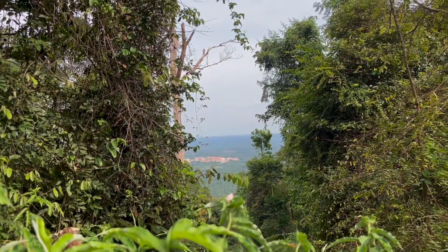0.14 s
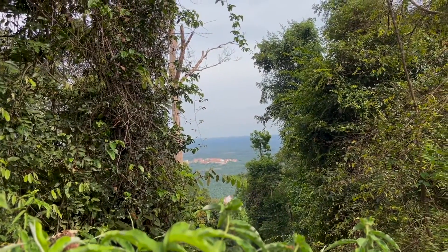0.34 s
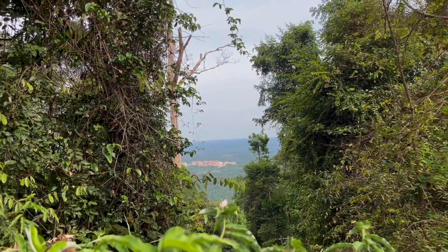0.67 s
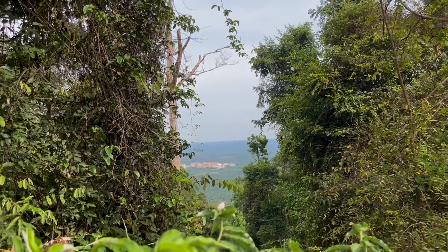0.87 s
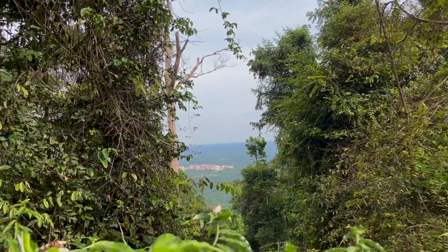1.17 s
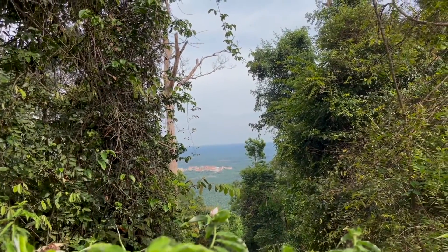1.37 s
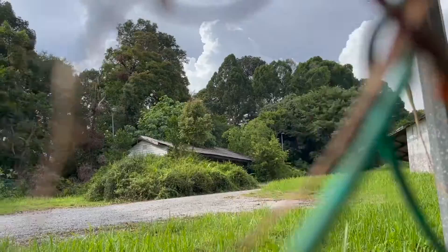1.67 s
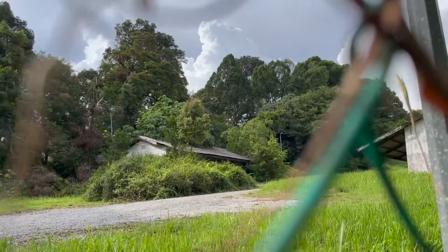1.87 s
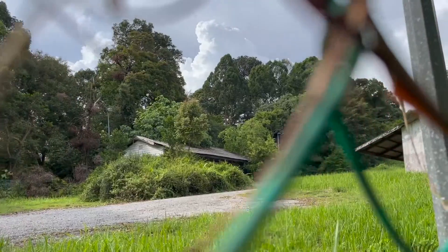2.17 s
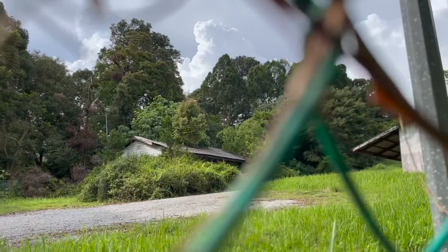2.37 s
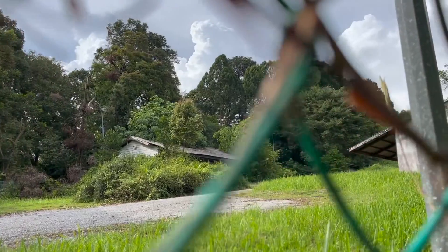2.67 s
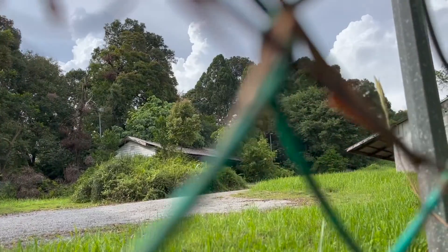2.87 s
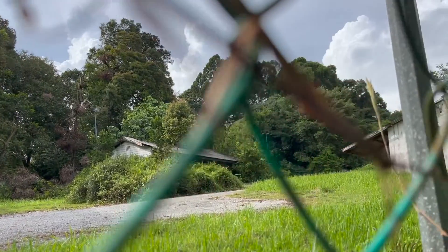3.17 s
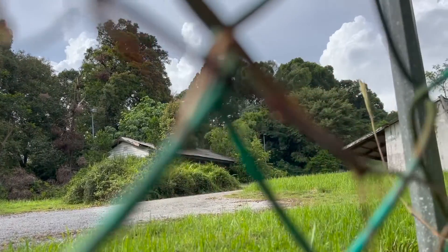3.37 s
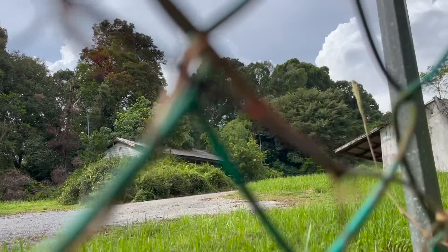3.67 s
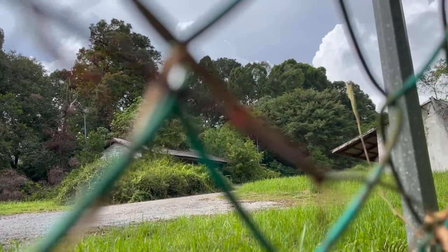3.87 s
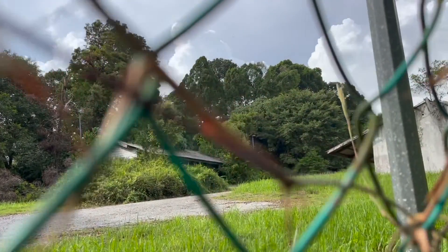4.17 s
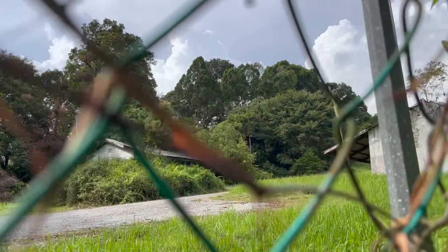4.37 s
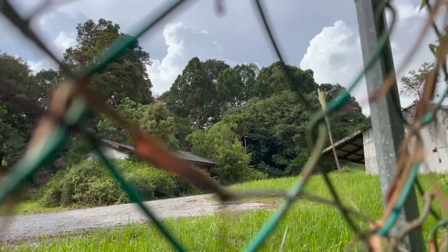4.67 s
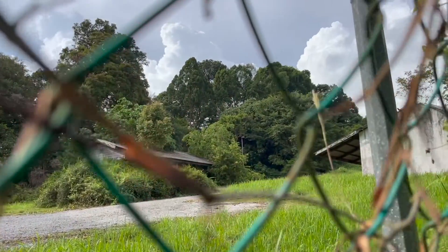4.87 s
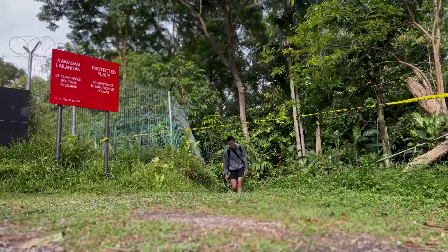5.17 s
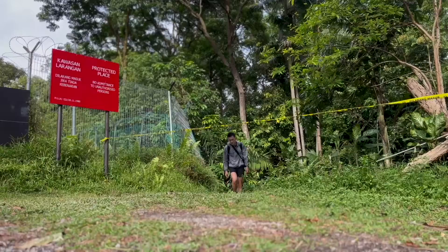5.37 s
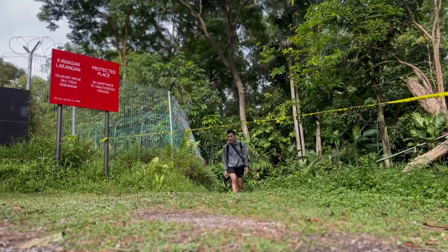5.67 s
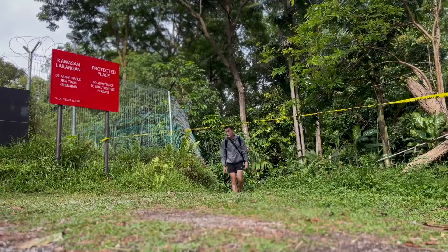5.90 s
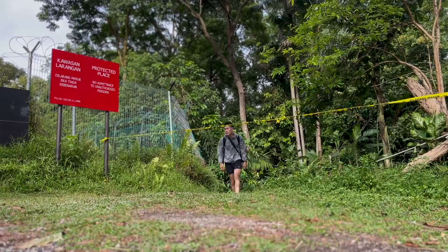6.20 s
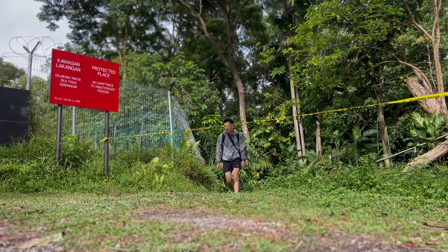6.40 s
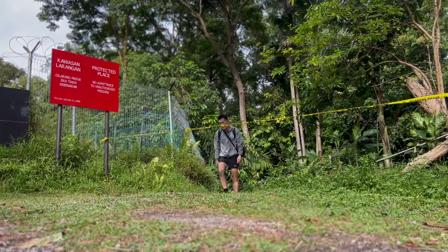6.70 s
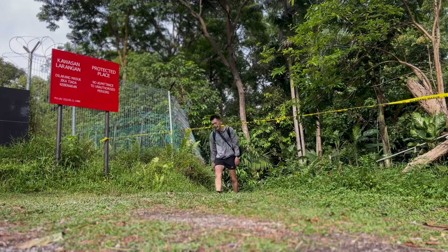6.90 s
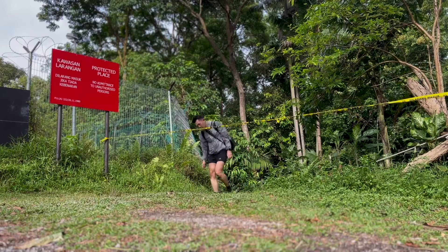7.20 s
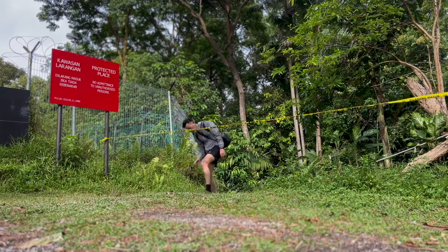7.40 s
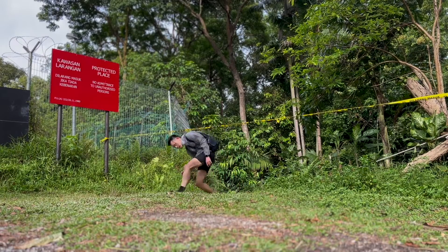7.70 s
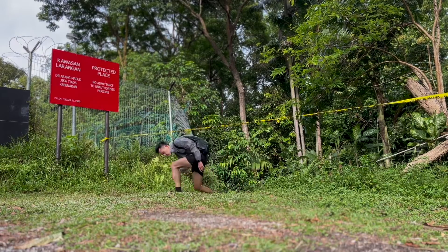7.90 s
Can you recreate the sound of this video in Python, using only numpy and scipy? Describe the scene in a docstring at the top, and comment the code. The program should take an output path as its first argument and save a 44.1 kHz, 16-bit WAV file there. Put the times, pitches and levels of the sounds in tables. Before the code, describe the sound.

Three outdoor spots follow with hard cuts under a constant high hiss of far cicadas. First, one bright, throbbing cicada dominates, with low rumble and hurried bird whistles. Next, a weaker rumble and light breeze carry close granular rustles, small dry snaps and distant slurred bird trills. Finally, quieter grass holds a few soft, dull footfalls, faint bird trills and a thin bush cricket. The stereo is open and diffuse, with faint forest echo.

```python
"""The edge of a tropical forest, at three spots one after another, all under a far chorus of cicadas.
On a lookout one cicada buzzes close by as a comb of lines over the filtered-noise rumble of the lowland;
a bird whistles and chatters. By a wire fence grass rustles in noise bursts and a far bird trills on.
In a clearing soft steps pass through grass while the far bird and a bush cricket trill in narrow noise."""
import sys
import numpy as np
from scipy import signal
from scipy.fft import rfft, irfft, next_fast_len
from scipy.io import wavfile
from scipy.ndimage import uniform_filter1d, map_coordinates

SR = 44100
rng = np.random.default_rng(int(sys.argv[2]) if len(sys.argv) > 2 else 0)


def master_out(mix):
    """Clip the mix to full scale and print it as 16-bit PCM to the path in sys.argv[1]."""
    frames = np.transpose(np.atleast_2d(mix))
    ceiling = np.clip(frames, -1, 1)
    pcm = np.round(ceiling * 32767).astype(np.int16)
    wavfile.write(sys.argv[1], SR, pcm)


N = 355005
TIME = np.arange(N) / SR
# the lookout comes first; the fence and the clearing begin here
FENCE_S, CLEARING_S = 1.633, 5.15


def amp(db):
    """Decibels to gain."""
    return 10 ** (np.asarray(db) / 20)


def unit(x):
    """Scale to rms 1."""
    return x / np.sqrt(np.mean(x ** 2) + 1e-20)


def along(points, hz):
    """(Hz, value) points read on a log frequency axis."""
    f, v = np.transpose(points)
    return np.interp(np.log(hz + 1), np.log(f + 1), v)


def curves(rows):
    """One value per sample for each column after the time."""
    s, *cols = np.transpose(rows)
    return [np.interp(TIME, s, c) for c in cols]


def between(start, end):
    """1 while the listener is at a spot, with 4 ms edges."""
    inside = (TIME >= start) & (TIME < end)
    return uniform_filter1d(inside.astype(float), size=176)


def wobble(rate):
    """A smooth random curve, rate knots a second."""
    knots = rng.standard_normal(int(N * rate / SR) + 4)
    coarse = TIME[::32]
    return np.interp(TIME, coarse, map_coordinates(knots, [coarse * rate]))


def filtered(x, response):
    """x times a response of frequency."""
    m = next_fast_len(N + 8192)
    return irfft(rfft(x, m) * response(np.fft.rfftfreq(m, 1 / SR)), m)[..., :N]


# likeness of a diffuse field at the two microphone ports: hz [Hz], likeness [0 to 1]
PORT_LIKENESS = [(60, .99), (150, 0.92), (300, 0.74), (600, 0.035), (2300, 0.23), (6300, 0.046),
                 (7200, 0.67), (8400, 1), (9000, 1), (10000, 0.15), (12000, 1)]


def spread(pair):
    """Two unrelated signals become left and right, as alike as the ports hear a diffuse field."""
    def mid_and_side(hz):
        turn = np.arccos(np.clip(along(PORT_LIKENESS, hz), -1, 1)) / 2
        return np.array([np.cos(turn), np.sin(turn)])

    mid, side = filtered(pair, mid_and_side)
    return unit(np.array([mid + side, mid - side]))


def rush(shape_db):
    """Diffuse stereo noise of rms 1 with a spectrum given as a function of frequency."""
    return spread(filtered(rng.standard_normal((2, N)), lambda hz: amp(shape_db(hz))))


def noise(points):
    """Diffuse stereo noise of rms 1 with a (Hz, dB) spectrum."""
    return rush(lambda hz: along(points, hz))


def rasp(pitch, width_hz):
    """Stereo noise of rms 1 in one narrow resonance, whose pitch may glide."""
    band = filtered(rng.standard_normal((2, 2, N)), lambda hz: 1 / (1 + (hz / width_hz) ** 2))
    phase = 2 * np.pi * np.cumsum(pitch * np.ones(N)) / SR
    return spread(band[0] * np.cos(phase) + band[1] * np.sin(phase))


def note(start, length, attack, release):
    """A smooth attack, a hold and a smooth release."""
    rise = (TIME - start) / attack
    fall = (start + length - TIME) / release
    ramp = np.clip(np.minimum(rise, fall), 0, 1)
    return np.sin(np.pi / 2 * ramp) ** 2


def trees(x, tail_s):
    """The diffuse echo of the forest edge: decaying noise convolved with the sound."""
    tail = rng.standard_normal((2, SR // 2)) * np.exp(-TIME[:SR // 2] / tail_s)
    return signal.fftconvolve(np.atleast_2d(x), tail / np.linalg.norm(tail[0]), axes=1)[:, :N]


# relative strength of the near cicada's lines: hz [Hz], level_db [dB]
CICADA_LINES = [(6170, -32), (6470, -34), (6760, -21), (7050, -7.5), (7350, 0), (7640, -2.5), (7940, -3.8),
                (8520, -3.5), (8820, -8), (9110, -10.5), (9410, -14), (9700, -13), (9990, -19.5),
                (10290, -20), (10580, -27), (11460, -35.5), (13900, -29), (14700, -37)]
# the abdomen stretches and the weight of the buzz moves up: time_s [s], stretch [-1 to 1]
ABDOMEN_STRETCH = [(.55, -1), (.95, 0), (1.4, 1)]
# what a full stretch does to each line: hz [Hz], change_db [dB]
STRETCH_TILT = [(7050, 2.5), (7350, -2.7), (7640, 0), (8230, 0), (8520, 2.5), (8820, -1), (9110, 3),
                (9410, -1)]
# its effort, and how much arrives scattered by leaves: time_s [s], level_db [dB], scattered_db [dB]
BUZZ_EFFORT = [(0, -39.2, -8), (.25, -38.3, -7), (.8, -40.2, -4), (1.25, -40.1, -5), (1.55, -38.9, -7)]
CLICK_HZ = 293.9
# the abdomen pumps, so that the buzz throbs in level (fraction) and click rate
THROB_HZ, THROB_DEPTH, THROB_SWING_HZ = 22, .12, .25


def near_cicada(apart=0.5):
    """Close by, tymbals click steadily: a comb of lines, each direct plus a blurred copy scattered by leaves."""
    flicker_rate, wander_hz = 50, .15  # flicker in knots a second
    main_line, purer_db = 25, 5
    smear, smear_swing = .6, .4  # scales of the random phase slip
    drift_db, drift_rate = 1.2, 4  # rate in knots a second
    stay = TIME < FENCE_S + .01
    pump = np.sin(2 * np.pi * np.cumsum(THROB_HZ + wobble(4.5)) / SR)
    click_rate = CLICK_HZ + THROB_SWING_HZ * pump + wander_hz * wobble(flicker_rate)
    phase = 2 * np.pi * np.cumsum(click_rate)[stay] / SR
    stretch = curves(ABDOMEN_STRETCH)[0][stay]
    level_db, scattered_db = curves(BUZZ_EFFORT)

    def blur(rate):
        return (wobble(rate)[stay] + 1j * wobble(rate)[stay]) / np.sqrt(2)

    song = np.zeros((2, stay.sum()))
    for k in range(21, 51):
        line_db = along(CICADA_LINES, k * CLICK_HZ) + stretch * along(STRETCH_TILT, k * CLICK_HZ)
        gain = amp(line_db + drift_db * wobble(drift_rate)[stay])
        # the line on the body's resonance stays purest; the top lines blur most
        height = k / main_line
        rate = flicker_rate * height ** np.clip(2 * height - 1, 1, 3)
        leaves = blur(rate) + apart * blur(rate) * np.array([[1], [-1]])
        scattered = height * amp(scattered_db[stay] - purer_db * (k == main_line)) * leaves
        # with every throb the clicks tighten and smear again
        slip = (smear - smear_swing * pump[stay]) * rng.standard_normal() * (k != main_line)
        song += gain * unit(np.real((1 + scattered) * np.exp(1j * (k * phase + slip))))
    buzz = np.pad(unit(song), ((0, 0), (0, N - stay.sum())))
    return buzz * amp(level_db) * (1 + THROB_DEPTH * pump) * between(0, FENCE_S)


# hiss of the far chorus: hz [Hz], level_db [dB]
CHORUS_HISS = [(5400, -28), (6000, -24), (6600, -13), (7200, -2), (7600, 0), (8100, -2.5), (9000, -12.5),
               (10000, -18), (11800, -32), (13200, -30), (14000, -26.5), (14500, -31), (14800, -40)]
# loudness at the lookout, by the fence and in the clearing: level_db [dB]
CHORUS_LEVELS = [-53, -48.6, -49.3]


def chorus(click_hz=300, ripple_db=3, peak_hz=7400, peak_width_hz=1100, shimmer_db=0.5):
    """Many far cicadas blur into a hiss; their common click rate leaves a ripple around its peak."""
    def hiss_db(hz):
        near_peak = np.exp(-((hz - peak_hz) / peak_width_hz) ** 2)
        ripple = ripple_db * np.cos(2 * np.pi * hz / click_hz) * near_peak
        low_fall_db = 90 * np.clip(1 - hz / 5400, 0, 1)
        return along(CHORUS_HISS, hz) - low_fall_db + ripple

    hiss = rush(hiss_db)
    level = np.array(CHORUS_LEVELS)[np.searchsorted([FENCE_S, CLEARING_S], TIME)]
    return hiss * amp(level + shimmer_db * wobble(7))


# spectrum of the lowland's deep rumble: hz [Hz], level_db [dB]
DEEP_RUMBLE = [(22, -42), (32, 11.5), (42, 8.5), (66, 12), (95, -1.5), (160, -46.5)]
# spectrum of the lowland's steady roar: hz [Hz], level_db [dB]
STEADY_ROAR = [(45, -40), (100, -1.5), (170, -2.5), (270, -6.5), (400, -15.5), (560, -16), (800, -27),
               (1100, -30.5), (1800, -47.5), (4000, -48), (6000, -63)]
ROAR_DB, DEEP_DB = -52.5, -53
SWELL_S, SWELL_WIDTH_S, SWELL_DB = 1.3, 0.33, 4


def lowland():
    """Distant traffic and wind reach the lookout: a steady noise roar and a deep rumble that swells once."""
    deep_db = DEEP_DB + SWELL_DB * np.exp(-((TIME - SWELL_S) / SWELL_WIDTH_S) ** 2)
    rumble = amp(deep_db) * noise(DEEP_RUMBLE)
    roar = amp(ROAR_DB) * noise(STEADY_ROAR)
    return (rumble + roar) * between(0, FENCE_S)


# hurried chirps in the trees: start_s [s], length_s [s], start_hz [Hz], end_hz [Hz], level_db [dB]
BIRD_CHIRPS = [(0.102, 0.12, 4930, 4720, -64), (0.194, 0.083, 4680, 4540, -65.5),
               (0.262, 0.085, 4770, 4860, -64), (0.333, 0.091, 4590, 4510, -68),
               (0.41, .11, 4900, 4960, -67), (0.534, 0.13, 5040, 4930, -64)]
# the hoarse chatter makes one swell
CALL_S, CALL_LENGTH_S, CALL_ATTACK_S, CALL_RELEASE_S = 0.018, 0.8, 0.078, 0.19
CALL_DB, CALL_HZ = -69.5, 4810


def bird(over_db=-2, under_db=-13.0, wet_db=-7):
    """At the lookout, gliding whistles over a hoarse chatter in three bands, two pulsing; the trees echo both."""
    quaver_hz, chatter_per_s, fall_hz = 40, 8, 260
    whistles = np.zeros(N)
    for s, length, start_hz, end_hz, db in BIRD_CHIRPS:
        glide = np.interp(TIME, [s, s + length], [start_hz, end_hz])
        pitch = glide + quaver_hz * wobble(260)
        swell = note(s, length, length / 3, length / 3)
        whistles += amp(db) * swell * np.sin(2 * np.pi * np.cumsum(pitch) / SR)
    beat = TIME * chatter_per_s % 1
    fall = fall_hz * (.5 - beat)
    over = amp(over_db) * rasp(5440 + fall, width_hz=200)
    under = amp(under_db) * rasp(2430 + fall, width_hz=96)
    hoarse = rasp(CALL_HZ, width_hz=210) + (over + under) * np.sqrt(np.sin(np.pi * beat))
    call = note(CALL_S, CALL_LENGTH_S, CALL_ATTACK_S, CALL_RELEASE_S)
    voices = whistles + hoarse * amp(CALL_DB) * call
    return (voices + amp(wet_db) * trees(voices, tail_s=0.25)) * between(0, FENCE_S)


# trills in the clearing: start_s [s], length_s [s], level_db [dB]
CRICKET_TRILLS = [(5.69, 1.0, -81.5), (6.783, .78, -80.5), (7.617, .6, -80.5)]
# one soft swell at the lookout, then three quick, ever louder chirps in the clearing:
# peak_s [s], level_db [dB], length_s [s]
CRICKET_SWELL_AND_CHIRPS = [(0.57, -72.5, 0.11), (5.801, -71, 0.012), (5.838, -63, 0.012),
                            (5.873, -59.5, 0.015)]
TRILL_HZ, TRILL_EDGE_S = 3446, 0.057


def low_cricket():
    """A bush cricket's soft swell, three quick chirps and even trills with short pauses, on one resonance."""
    trill, swell_and_chirps = np.zeros(N), np.zeros(N)
    for s, length, db in CRICKET_TRILLS:
        trill += amp(db) * note(s, length, TRILL_EDGE_S, TRILL_EDGE_S)
    for s, db, length in CRICKET_SWELL_AND_CHIRPS:
        swell_and_chirps += amp(db) * np.exp(-((TIME - s) / length) ** 2)
    return rasp(TRILL_HZ, width_hz=170) * trill + rasp(TRILL_HZ, width_hz=123) * swell_and_chirps


# a click just where the scene changes, then stems snapping and shoes knocking underfoot, level before a common
# gain: start_s [s], level_db [dB], centre_hz [Hz], decay_s [s]
SNAP_ROWS = [(1.632, -51, 1770, 0.00089), (2.067, -60, 2400, .003), (3.638, -52, 3000, .002),
             (3.651, -57, 1100, 0.0024), (3.878, -51.5, 3340, 0.0044), (3.967, -54, 4000, 0.0033),
             (4.17, -52, 2300, .003), (4.394, -52, 2300, .003), (4.568, -49.5, 3140, 0.0044),
             (4.969, -48, 4450, .005), (6.795, -59.5, 2500, .005), (7.731, -59, 540, 0.0062),
             (7.79, -56.5, 570, 0.0045)]


def snaps(gain_db=-4.0, width_octaves=0.67):
    """Each sharp little click is a broad band of noise that dies within milliseconds."""
    out, t = np.zeros((2, N + SR)), TIME[:SR // 20]
    for s, db, hz, life in SNAP_ROWS:
        edges = np.clip(hz * 2 ** (width_octaves * np.array([-1, 1])), 100, SR / 3)
        shared = rng.standard_normal(len(t))
        own = .5 * rng.standard_normal((2, len(t)))
        burst = (shared + own) * np.exp(-t / life)
        crack = signal.sosfilt(signal.butter(2, edges, "band", fs=SR, output="sos"), burst)
        out[:, round(s * SR):][:, :len(t)] += amp(db + gain_db) * crack / abs(crack).max()
    return out[:, :N]


# spectrum of the distant rumble: hz [Hz], level_db [dB]
FAR_RUMBLE = [(22, -26.5), (40, -7.5), (70, 1.5), (110, -5.5), (170, -11), (280, -19), (400, -27),
              (700, -39), (1500, -46.5), (2900, -50.5), (4500, -46), (6000, -79)]
# its brief surges: peak_s [s], rise_db [dB]
RUMBLE_SURGES = [(3.2, 5), (5.25, 6)]
# spectrum of the breeze in the open grass: hz [Hz], level_db [dB]
GRASS_BREEZE = [(150, -0.5), (400, 4), (600, -1.5), (1000, -5), (1800, -19.5), (4000, -14.5), (8000, -23),
                (15000, -11.5)]
# the rumble builds up after the move to the fence, then holds
FAR_FENCE_DB, FAR_CLEARING_DB, BUILD_DB, BUILD_S = -51.5, -53, 7.5, 0.93
SURGE_WIDTH_S, SURGE_HZ = 0.028, 160
BREEZE_DB, FRESHEN_DB_PER_S = -71, 1.33


def open_air(lump_db=1, flutter_db=2):
    """A weaker noise rumble lies under fence and clearing; by the fence a freshening breeze stirs the grass."""
    age = TIME - FENCE_S
    fence_db = FAR_FENCE_DB - BUILD_DB * np.clip(1 - age / BUILD_S, 0, 1)
    level = np.where(TIME < CLEARING_S, fence_db, FAR_CLEARING_DB)
    far = noise(FAR_RUMBLE) * amp(level + lump_db * wobble(12))
    surges = sum(db * np.exp(-((TIME - s) / SURGE_WIDTH_S) ** 2) for s, db in RUMBLE_SURGES)
    # only the bass surges
    bass = filtered(far, lambda hz: 1 / (1 + (hz / SURGE_HZ) ** 4))
    far = far + (amp(surges) - 1) * bass
    breeze = noise(GRASS_BREEZE) * amp(BREEZE_DB + FRESHEN_DB_PER_S * age + flutter_db * wobble(15))
    return far * between(FENCE_S, np.inf) + breeze * between(FENCE_S, CLEARING_S)


# phrases of the trill: start_s [s], length_s [s], level_db [dB]
TRILL_PHRASES = [(1.247, 1, -75.5), (2.251, 0.94, -73), (3.342, 0.75, -72.5), (4.419, 0.59, -68),
                 (5.543, .5, -76), (6.506, 0.81, -83), (7.196, 0.75, -75.5)]
# every phrase swells, glides upward and fades
PHRASE_START_HZ, GLIDE_HZ_PER_S, PHRASE_ATTACK_S, PHRASE_RELEASE_S = 4680, 350, 0.11, 0.17
# each phrase is a quick run of notes that slur downward
NOTES_PER_S, SLUR_HZ = 23, 280


def far_trills(others_db=-83):
    """A small far bird trills in pulsed narrow noise, its slurred notes creeping up; others blur behind it."""
    level, pitch = np.zeros(N), np.full(N, float(PHRASE_START_HZ))
    for s, length, db in TRILL_PHRASES:
        level += amp(db) * note(s, length, PHRASE_ATTACK_S, PHRASE_RELEASE_S)
        pitch = np.where(TIME >= s, PHRASE_START_HZ + GLIDE_HZ_PER_S * (TIME - s), pitch)
    uneven_db, uneven_hz, direct_db, wet_db = 2, 70, -4.5, -3.5
    beat = np.cumsum(NOTES_PER_S + 2 * wobble(10)) / SR % 1
    notes = unit(np.sin(np.pi * beat) ** 2 * amp(uneven_db * wobble(NOTES_PER_S)))
    slurred = pitch + SLUR_HZ * (.5 - beat) + uneven_hz * wobble(NOTES_PER_S)
    song = rasp(slurred, width_hz=180) * notes * level
    echo = amp(wet_db) * trees(song, tail_s=0.11)
    others = amp(others_db) * rasp(4920, width_hz=170)
    return (amp(direct_db) * song + echo + others) * between(FENCE_S, np.inf)


def scuffs(rows, dull, crisp, dull_db, crisp_db, grain_db, snap, snap_s, right_db):
    """Each contact snaps, then swells and dies: a dull push and the crackle of many small blades."""
    push, crackle = np.zeros((2, N))
    for s, push_db, blades_db, length in rows:
        age = np.clip(TIME - s, 0, 1)
        u = age / (length / 4)
        swell = u * np.exp(1 - u) + snap * (age > 0) * np.exp(-age / snap_s)
        push += amp(push_db + dull_db) * swell
        crackle += amp(blades_db + crisp_db) * swell
    grains = unit(amp(grain_db * wobble(450)))
    dull_part = push * noise(dull) * amp([[-right_db], [right_db]])
    return grains * (dull_part + crackle * noise(crisp))


# brushes of grass and clothing by the fence, levels before the trims dull_db and crisp_db:
# start_s [s], push_db [dB], blades_db [dB], length_s [s]
GRASS_RUSTLES = [(2.058, -59, -73, 0.049), (2.16, -63, -71, 0.13), (2.913, -74, -71, 0.043),
                 (3.309, -63, -74, 0.11), (3.56, -64.5, -75.5, 0.3), (3.648, -57.5, -85, 0.029),
                 (3.874, -56, -64, 0.024), (4.15, -64, -65, 0.078), (4.365, -57, -63, 0.11),
                 (4.962, -55, -63.5, 0.072), (5.02, -49.5, -67.5, 0.15), (5.138, -48, -71, 0.061)]
# dull part of a brush: hz [Hz], level_db [dB per Hz]
BRUSH_DULL = [(200, 11.5), (500, 8.5), (900, 8), (1500, 5), (2100, -17), (4000, -63)]
# crisp blades of grass: hz [Hz], level_db [dB per Hz]
BLADES_CRISP = [(900, -34), (1800, -2.5), (4000, -0.5), (6000, -3.5), (14000, -7)]


def rustles():
    """Close by the fence, grass and clothing brush past as granular noise bursts."""
    brushes = scuffs(GRASS_RUSTLES, BRUSH_DULL, BLADES_CRISP, dull_db=-8.5, crisp_db=2.0,
                     grain_db=1.5, snap=0.66, snap_s=0.0081, right_db=2.0)
    return brushes * between(0, CLEARING_S)


TICK_AT_S, TICK_DB, TICK_DECAY_S, TICK_HZ = 3.738, -55, 0.0054, 14400


def tick():
    """One thin, very high tick by the fence: a short burst of treble noise that dies at once."""
    decay = (TIME > TICK_AT_S) * np.exp(-abs(TIME - TICK_AT_S) / TICK_DECAY_S)
    return rasp(TICK_HZ, width_hz=2000) * amp(TICK_DB) * decay


# footfalls in the clearing, levels before the trims dull_db and crisp_db:
# start_s [s], push_db [dB], blades_db [dB], length_s [s]
FOOTFALLS = [(6.11, -70.5, -84, 0.042), (6.786, -77, -68.5, 0.045), (7.059, -69.5, -79, 0.055),
             (7.41, -71, -92, .05), (7.68, -68, -78.5, 0.15), (7.788, -64.5, -82, 0.045)]
# dull turf underfoot: hz [Hz], level_db [dB per Hz]
TURF_DULL = [(150, -5), (400, 3), (560, 6), (850, -16), (1500, -14), (3000, -43)]
# crisp litter underfoot: hz [Hz], level_db [dB per Hz]
LITTER_CRISP = [(1000, -41), (2000, 0), (2600, 0), (3300, -7), (8000, -21)]


def steps():
    """In the clearing, soft footfalls press dull turf and crackling litter."""
    return scuffs(FOOTFALLS, TURF_DULL, LITTER_CRISP, dull_db=0.0, crisp_db=-1.5,
                  grain_db=1.5, snap=0.63, snap_s=0.0069, right_db=1)


def scene():
    """Insects, birds, air and the small sounds of walking."""
    wildlife = near_cicada() + chorus() + far_trills() + low_cricket() + bird()
    wildlife = wildlife * amp([[.2], [-.2]])  # slightly left
    return wildlife + lowland() + open_air() + rustles() + snaps() + steps() + tick()


# phase between the two microphone ports: hz [Hz], left_lead [radians]
PORT_LEAD = [(4500, 0), (6000, -.9), (7000, -1.9), (8200, -3.1), (9100, -3.2), (9700, -3.8), (10200, -4.7),
             (10800, -6.2), (13000, -6.4), (14000, -8), (14600, -9.4)]
TOP_HZ, LOW_CUT_HZ = 15500, 35


def record(dry):
    """The microphone ports turn the treble's phase apart; the deepest bass and the top are cut."""
    def microphone(hz):
        ports = np.exp(.5j * along(PORT_LEAD, hz) * np.array([[1], [-1]]))
        low_cut = hz ** 8 / np.sqrt(hz ** 16 + float(LOW_CUT_HZ) ** 16)
        return ports * low_cut * (hz < TOP_HZ)

    return filtered(dry, microphone)


dry = scene()
out = record(dry)
master_out(out)
```